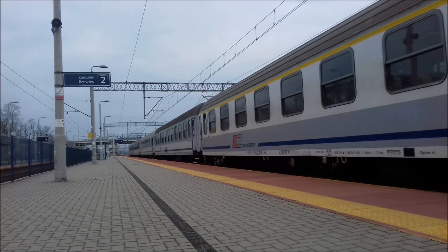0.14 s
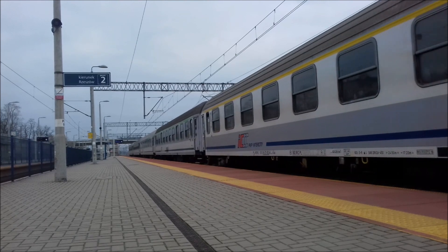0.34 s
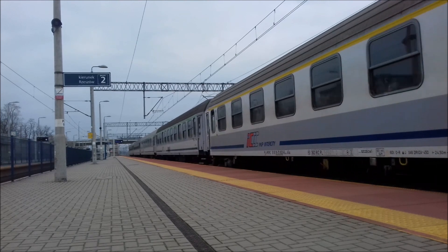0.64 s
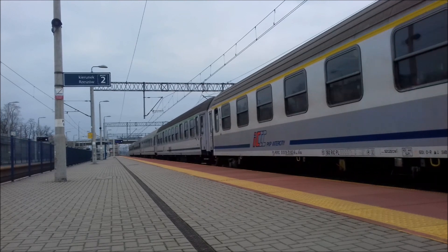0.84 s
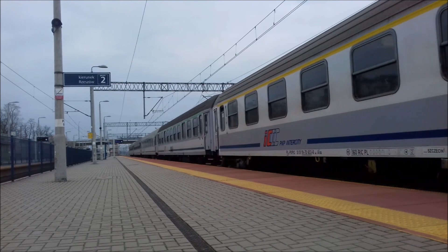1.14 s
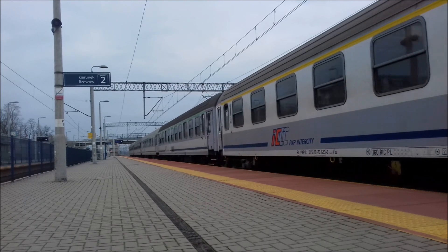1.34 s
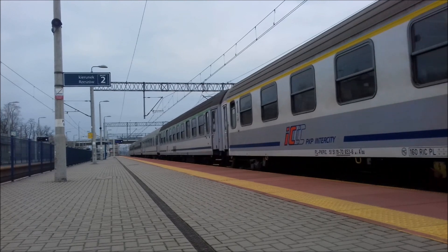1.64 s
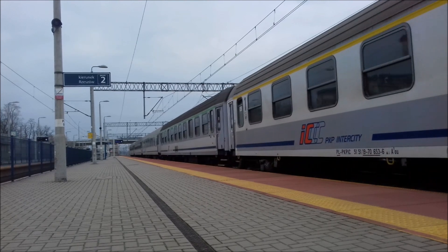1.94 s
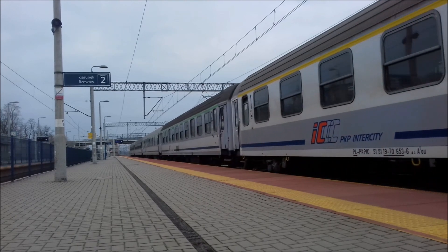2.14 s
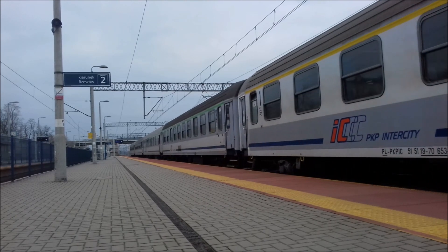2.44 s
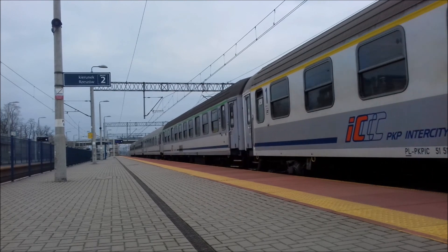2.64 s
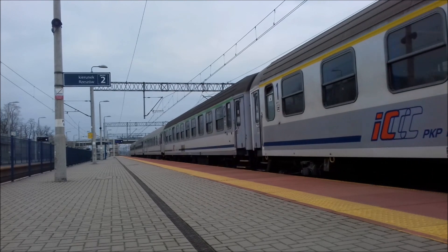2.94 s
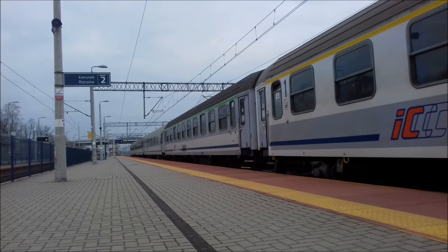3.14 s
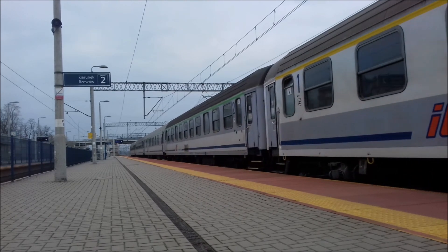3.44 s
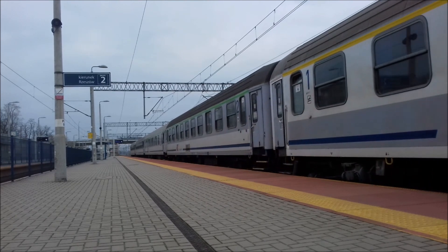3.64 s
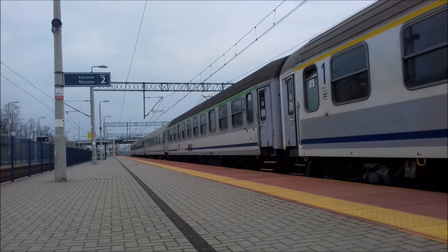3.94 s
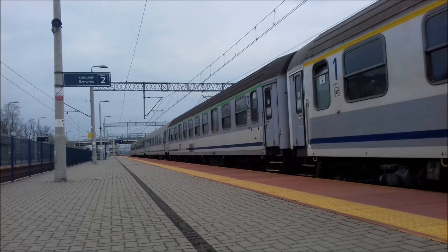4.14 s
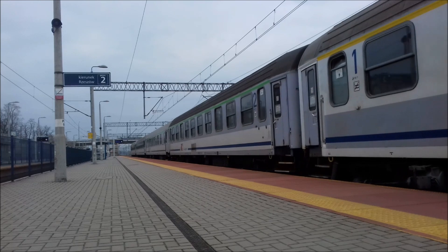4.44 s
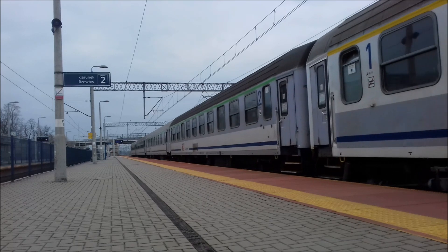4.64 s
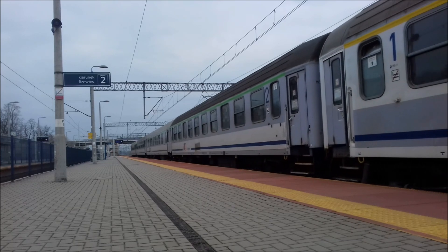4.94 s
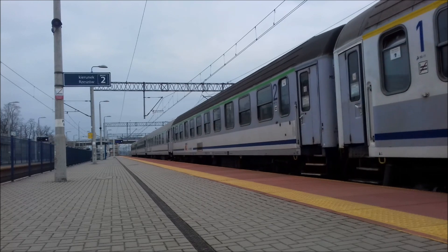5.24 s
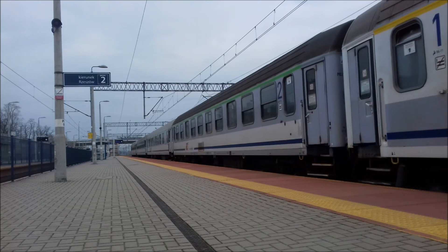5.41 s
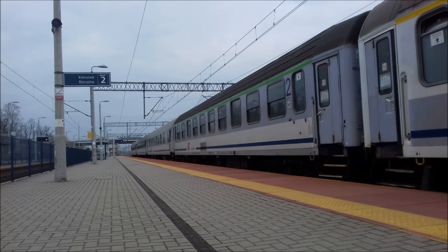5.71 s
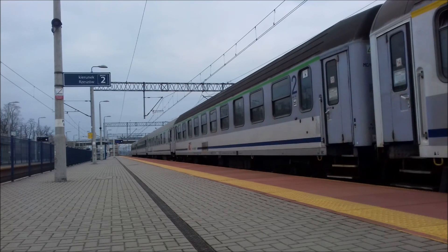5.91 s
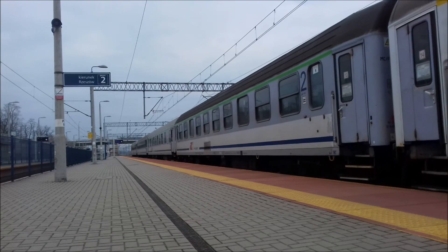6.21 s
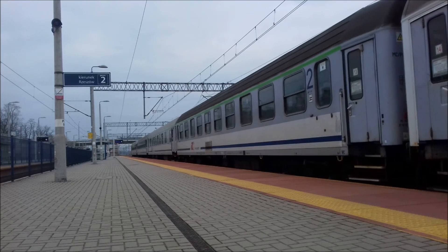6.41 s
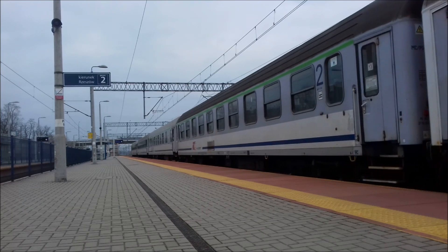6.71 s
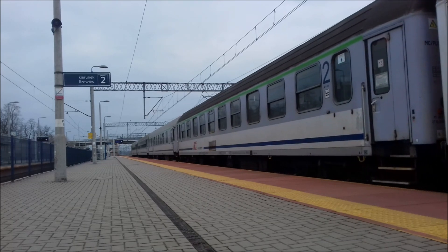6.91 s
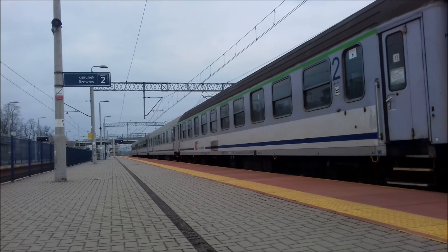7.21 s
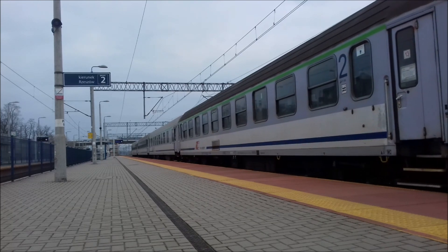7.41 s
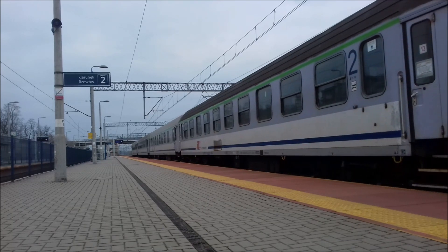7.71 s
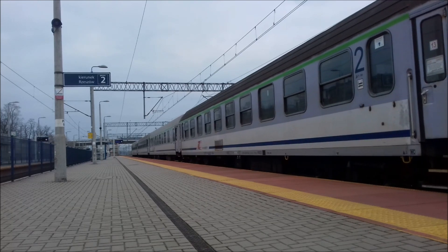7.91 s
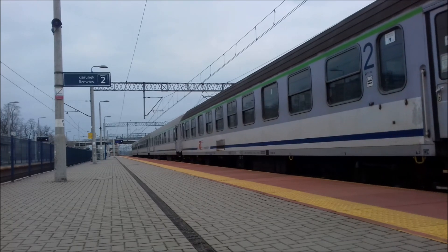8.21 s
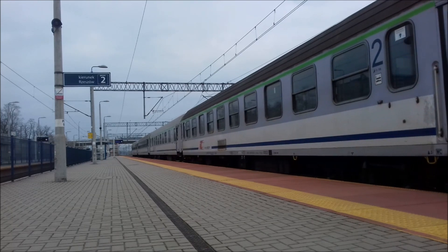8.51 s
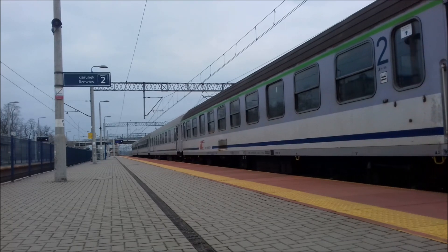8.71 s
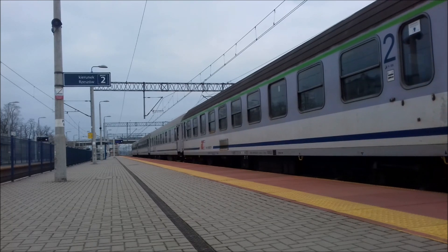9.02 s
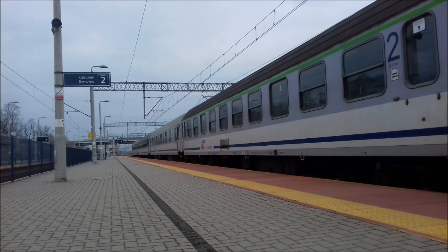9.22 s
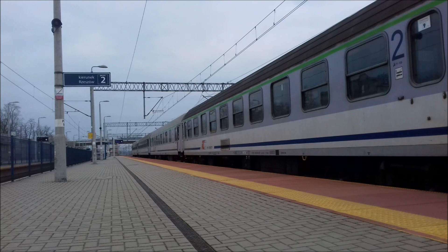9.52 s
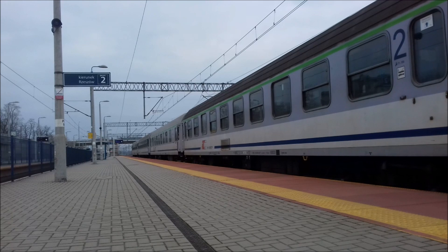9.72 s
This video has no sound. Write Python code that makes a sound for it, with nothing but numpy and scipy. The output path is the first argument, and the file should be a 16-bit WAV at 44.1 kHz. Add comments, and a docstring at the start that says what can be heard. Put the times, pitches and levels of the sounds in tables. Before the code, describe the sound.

High, steady brake squeal from a train slowing beside a platform, weakening into stuttering, creaky rasps as it nearly stops.

```python
"""A wavering squeal near 4.5 kHz: a passenger train brakes to a halt beside an open platform.
Its brake discs ring, many wheels beating against each other over pad hiss and rolling noise.
Faint whistles, scuffs and a half-pitch rattle come and go.
At walking pace a pad starts to groan, then grabs the disc in short, rasping stick-slip bursts."""
import sys
import numpy as np
from scipy import signal
from scipy.fft import rfft, irfft, next_fast_len
from scipy.io import wavfile
from scipy.ndimage import uniform_filter1d, minimum_filter1d, map_coordinates

SR = 44100
rng = np.random.default_rng(int(sys.argv[2]) if len(sys.argv) > 2 else 0)


def master_out(mix):
    """Clip the mix to full scale and print it as 16-bit PCM to the path in sys.argv[1]."""
    frames = np.transpose(np.atleast_2d(mix))
    ceiling = np.clip(frames, -1, 1)
    pcm = np.round(ceiling * 32767).astype(np.int16)
    wavfile.write(sys.argv[1], SR, pcm)


N = 434826
TIME_S = np.arange(N) / SR

# Pitch of the two loudest discs. Each row: time in seconds, near disc in Hz, far disc in Hz.
DISC_PITCH = [(0.1, 4556, 4523), (1, 4527, 4541), (2, 4511, 4526), (3, 4504, 4538), (4, 4504, 4539),
              (6, 4521, 4549), (7.8, 4529, 4545), (8.7, 4471, 4539)]


def amp(db):
    """Decibels to gain."""
    return np.exp(np.asarray(db) * (np.log(10) / 20))


def unit(x):
    """Scale to rms 1."""
    return x / np.sqrt(np.mean(np.abs(x) ** 2) + 1e-20)


def along(points, hz):
    """Interpolate (Hz, value) points on a log frequency axis."""
    knots_hz, values = np.transpose(points)
    return np.interp(np.log(hz + 1), np.log(np.sort(knots_hz) + 1), values)


def curves(rows):
    """One value per sample for each column after the time."""
    knots_s, *columns = np.transpose(rows)
    return [np.interp(TIME_S, knots_s, column) for column in columns]


def strokes(rows, edge_s):
    """Soft-edged gain that opens for each (start s, length s, dB) row."""
    gain = np.zeros(N)
    for start_s, length_s, db in rows:
        span = slice(*np.searchsorted(TIME_S, [start_s - edge_s, start_s + length_s + edge_s]))
        inside_s = np.minimum(TIME_S[span] - start_s, start_s + length_s - TIME_S[span])
        gain[span] += amp(db) * np.clip(inside_s / edge_s + .5, 0, 1)
    return gain


def wobble(knots_per_s):
    """Smooth random curve, rms near 1."""
    knots = rng.standard_normal(int(N * knots_per_s / SR) + 4)
    coarse = np.arange(0, N + 20, 20)
    return np.interp(np.arange(N), coarse, map_coordinates(knots, [coarse * knots_per_s / SR]))


def filtered(x, response):
    """Apply a gain given as a function of Hz."""
    size = next_fast_len(N + SR // 2)
    return irfft(rfft(x, size) * response(np.fft.rfftfreq(size, 1 / SR)), size)[..., :N]


def rush(spectrum, patchy_db):
    """Coloured noise of rms 1 with patches of random gain."""
    bins = signal.stft(rng.standard_normal(N), nperseg=512)[2]
    patches = uniform_filter1d(uniform_filter1d(rng.standard_normal(bins.shape), 5, 0), 12, 1)
    noise = signal.istft(bins * amp(patchy_db * unit(patches)), nperseg=512)[1][:N]
    return unit(filtered(noise, lambda hz: amp(along(spectrum, hz))))


def phasor(hz):
    """Unit complex tone that follows a pitch curve."""
    return np.exp(2j * np.pi * np.cumsum(hz) / SR)


def beating(width_hz):
    """Complex gain of many like tones spread over about width_hz."""
    real, imag = filtered(rng.standard_normal((2, N)), lambda hz: 1 / (1 + (hz / width_hz) ** 3))
    return unit(real + 1j * imag)


def levelled(x):
    """Keep fast beats, even out slow swells."""
    return x / np.sqrt(np.abs(uniform_filter1d(np.abs(x) ** 2, size=SR // 11)) + 1e-9)


def speed(stop_s=10):
    """Even braking: 1 at the start, 0 at the stop."""
    return 1 - TIME_S / stop_s


def squeal(swell_hz=2.092, swell_db=2.5, flutter_depth=.16, second_db=-42, third_db=-57):
    """Two discs hold clear tones; the other wheels and their reflections beat around them."""
    # Tones over the rest of the train. Each row: time in seconds, near disc in dB, far disc in dB.
    prominence = [(0, 1, -12.5), (1.1, 5, -11.5), (2.1, -1.5, -14.5), (2.7, 13, 2.5), (3.6, 3, -3),
                  (4.6, -7, -3.5), (5.4, -6, 0), (6.8, 2, -5), (8.1, -2.5, 2.5), (8.8, 2.5, -15),
                  (9.8, 9.5, -8)]
    # Squeal as brake pressure varies. Each row: time in seconds, level in dB.
    strength = [(0, -8), (1.4, -8.5), (2.1, -11.5), (2.5, -7), (2.75, -13.5), (2.95, -9.5), (3.4, -16),
                (3.9, -10.5), (4.4, -13.5), (5.25, -8.5), (6.15, -11.5), (6.7, -9.5), (7.2, -10.5),
                (8, -17.5), (8.3, -21.5), (8.8, -26), (9.5, -24.5), (9.86, -20)]
    near_hz, far_hz = curves(DISC_PITCH)
    near = phasor(near_hz + 1.902 * wobble(14))
    far = phasor(far_hz + 4 * wobble(12))
    rest = phasor((near_hz + far_hz) / 2)
    crowd = rest * beating(width_hz=36)
    # a neighbouring disc mode flutters the near tone: sidebands, the lower one stronger
    flutter = phasor(156 + 5 * wobble(25))
    fluttered = near * (1 + flutter_depth * speed() ** 2 * (.7 / flutter + .3 * flutter))
    near_db, far_db = curves(prominence)
    chorus = amp(near_db) * fluttered + amp(far_db) * far + crowd
    # turning wheels swell the level, ever slower and shallower
    turns = swell_hz * (np.cumsum(speed()) / SR - .22)
    wheel_db = swell_db * speed() ** 2 * np.cos(2 * np.pi * turns)
    level = np.sqrt(2) * amp(curves(strength)[0] + wheel_db + .86 * wobble(14) + wobble(8))
    # overtones take their own paths and fade as the squeal weakens
    drive = np.minimum(1, level / amp(-12))
    second = levelled(near ** 2 + rest ** 2 * beating(width_hz=60))
    third = levelled(.6 * near ** 3 + rest ** 3 * beating(width_hz=100))
    overtones = amp(second_db) * second + amp(third_db) * third
    return (level * (levelled(chorus) + drive * overtones)).real


def disc(friction):
    """Friction rings the free modes of the steel disc."""
    # Each row: centre in Hz, width in Hz, peak in dB over the plain friction.
    modes = [(4370, 35, 3), (5080, 48, 8), (5400, 55, 5.5), (8150, 20, -5), (8510, 4.3, 2.5),
             (9300, 110, -1.5), (10900, 110, 4.5), (11360, 130, 4), (12580, 70, 5), (13920, 70, 5.5)]

    def response(hz):
        power = sum(amp(db) ** 2 / (1 + (2 * (hz - centre_hz) / width_hz) ** 2)
                    for centre_hz, width_hz, db in modes)
        return np.sqrt(1 + power)
    return filtered(friction, response)


def rolling(dust_db=-60, roar_db=-39.5, rumble_db=-56.5, slowing_db=-6.5):
    """Pads hiss; dust scrapes, wheels roar on the rails and coaches rumble, most as a bogie passes."""
    # Noise spectra. Each row: frequency in Hz, relative density in dB.
    hiss_spectrum = [(3000, -30.5), (3550, -14), (3750, -12), (4000, -2.5), (4300, 0), (4600, 7),
                     (4800, -12), (5200, -23.5), (6000, -31), (7000, -29), (7600, -48.5), (9000, -23),
                     (10000, -54.5)]
    dust_spectrum = [(5500, -7.5), (7000, 7.5), (8600, 3), (10000, -5.5), (11200, -3.5), (12700, -4.5),
                     (14500, -4), (15600, -8.5)]
    roar_spectrum = [(90, -22), (150, -3), (260, -0.5), (350, -4.5), (450, 0.5), (850, -0.5), (1100, 1),
                     (1300, 0.5), (1600, 2), (2000, 1), (3200, 0.5), (5000, -3), (8000, -25), (12000, -54)]
    rumble_spectrum = [(25, -20.5), (45, -12), (65, -8.5), (90, 3.5), (130, -2), (220, -13), (500, -43)]
    # Pad hiss. Each row: time in seconds, level in dB.
    hiss_levels = [(0, -19.5), (.24, -25), (.7, -19.5), (1.3, -23), (1.8, -21), (3.6, -25.5), (4.9, -23),
                   (6.9, -26), (7.8, -32), (9.86, -39)]
    # Passing bogies. Each row: centre and half length in seconds, roar, rumble and dust boosts in dB.
    bogies = [(0.396, .65, 3, 5, 1), (4.363, 0.65, 3.5, 5.5, 2), (5.9, 1.2, 3, 3, 0.5),
              (8.4, 1.1, 6.5, 5, 1.5)]
    roar_boost_db, rumble_boost_db, dust_boost_db = sum(
        np.outer(boosts_db, np.exp(-((TIME_S - centre_s) / half_s) ** 2))
        for centre_s, half_s, *boosts_db in bogies)
    hiss_db, = curves(hiss_levels)
    hiss = amp(.7 * wobble(30)) * unit(disc(rush(hiss_spectrum, patchy_db=.8)))
    dust = amp(1.4 * wobble(50)) * unit(disc(rush(dust_spectrum, patchy_db=1.2)))
    dust_gain = amp(dust_db + 1.4 * (hiss_db - hiss_db.mean()) + dust_boost_db + 1.1 * wobble(6))
    roar = amp(roar_db + roar_boost_db) * rush(roar_spectrum, patchy_db=1.78)
    rumble_gain = amp(rumble_db + slowing_db * (1 - speed()) + rumble_boost_db)
    rumble = rumble_gain * rush(rumble_spectrum, patchy_db=-.5)
    return amp(hiss_db) * hiss + dust_gain * dust + roar + rumble


def whistles():
    """Single modes of other discs sing up faintly and waver."""
    # Each row: start in seconds, length in seconds, pitch in Hz, level in dB.
    notes = [(0, 2.04, 5470, -47), (.4, 2.3, 3710, -41.5), (0.552, 0.56, 8510, -53.5),
             (6.56, 0.23, 5780, -48), (7.986, .44, 5170, -38.5), (9.6, .19, 5080, -38.5)]
    waver = beating(width_hz=55) * amp(2.5 * wobble(7) - 1)
    sound = np.zeros(N)
    for start_s, length_s, hz, db in notes:
        tone = np.exp(2j * np.pi * hz * TIME_S) * np.roll(waver, rng.integers(N))
        sound += strokes([(start_s, length_s, db)], edge_s=.059) * tone.real
    return sound


def scuffs():
    """Brief dry scrapes of a pad that does not yet sing."""
    # Each row: start in seconds, length in seconds, level in dB.
    scrapes = [(.49, .03, -40.5), (.84, 0.05, -40), (1.71, 0.052, -37.5), (2.4, 0.084, -42.5),
               (2.86, 0.054, -41), (3.31, 0.063, -40.5), (3.76, 0.042, -34.5), (4.03, .04, -40),
               (4.19, 0.049, -38.5)]
    # Each row: frequency in Hz, relative density in dB.
    spectrum = [(500, -52), (1400, -26.5), (1900, -9.5), (2270, 3.5), (2700, -8.5), (3800, -27),
                (7000, -68)]
    return strokes(scrapes, edge_s=.04) * rush(spectrum, patchy_db=3)


def pad_rattle():
    """A pad that skips every other cycle adds flickering tones at 1/2 and 3/2 of the squeal pitch."""
    # Each row: start in seconds, length in seconds, level in dB.
    rattles = [(2.65, 0.38, -38.5), (4.6, 0.37, -40), (4.95, 0.46, -33), (5.22, .06, -31),
               (5.55, 0.92, -34.5), (6.45, 0.416, -29.5), (6.87, 0.39, -32)]
    half = phasor(curves(DISC_PITCH)[1] / 2)
    tones = half * beating(width_hz=70) + amp(-20) * half ** 3 * beating(width_hz=140)
    flicker = amp(2.3 * wobble(30) - 4.4)
    return flicker * strokes(rattles, edge_s=.07) * unit(tones.real)


def groan(peak_s=8.46, level_db=-36, rise_db_per_s=6.5, fall_db_per_s=.5, stop_hz=594, glide_hz=249.3):
    """A dragging pad hums and stutters in its caliper, its pitch sinking as the train slows."""
    swell_db = np.minimum(rise_db_per_s * (TIME_S - peak_s), fall_db_per_s * (peak_s - TIME_S))
    stutter = amp(2.8 * wobble(18) - 1)
    hum = phasor(stop_hz + glide_hz * speed()) * beating(width_hz=72)
    return amp(level_db + swell_db) * stutter * unit(hum.real)


def grabs(edge_s=.008, release_s=.008, sag_hz_per_s=250, honk_fade_s=8.55, grit_db=-8):
    """Stick-slip: each grab is a sagging buzz with shifting harmonics and a puff of grit per slip."""
    # Each row: start in seconds, length in seconds, first slip rate in Hz, level in dB.
    bites = [(7.637, 0.024, 600, -39), (7.741, 0.058, 590, -38.5), (8.045, 0.078, 594.6, -28.5),
             (8.266, .04, 572.6, -29), (8.33, .038, 566, -26.5), (8.521, .032, 560.2, -25),
             (8.581, 0.033, 563.4, -27.5), (8.713, .08, 559.7, -25.5), (8.836, .03, 589.2, -30.5),
             (8.887, .03, 560, -24.5), (9.012, .07, 531.5, -24.5), (9.084, .08, 562, -25.5),
             (9.207, 0.034, 550.8, -28.5), (9.25, .055, 520, -24.5), (9.357, 0.063, 546, -24.5),
             (9.607, 0.051, 558.4, -25.5), (9.655, .105, 528, -26), (9.758, .036, 565, -23),
             (9.802, .062, 545.2, -29)]
    # Caliper response. Each row: frequency in Hz, relative gain in dB.
    caliper = [(100, -48), (300, -29.5), (550, -5), (1110, -4), (1600, 0), (2100, -3), (3100, -3),
               (4250, 0), (4800, -13.5), (5400, -10.5), (7800, -24), (8800, -22), (10000, -43),
               (15500, -39.5)]
    bite = strokes([(start_s, length_s, db) for start_s, length_s, _, db in bites], edge_s)
    pole = np.exp(-1 / (release_s * SR))
    grip = np.maximum(bite, signal.lfilter([1 - pole], [1, -pole], bite))
    starts_s, _, first_hz, _ = np.transpose(bites)
    latest = np.searchsorted(starts_s, TIME_S + edge_s / 2) - 1
    slip_hz = first_hz[latest] - sag_hz_per_s * np.maximum(0, TIME_S - starts_s[latest])
    cycles = np.cumsum(slip_hz * (1 + .015 * wobble(70) + .023 * wobble(400))) / SR
    slipping = np.flatnonzero(grip > amp(-70))
    # the caliper honks at twice the slip rate, less as the disc creeps
    honk_db = 8 - 7 * np.maximum(0, TIME_S[slipping] - honk_fade_s)
    buzz = np.zeros(N)
    for k in range(1, 28):
        # the contact patch moves: harmonics drift in strength and phase, high ones faster
        knots_per_s = 45 + 22 * k
        knots = rng.standard_normal((int(N * knots_per_s / SR) + 2, 2)) @ [1, 1j]
        drift = 1 + .7 * np.interp(slipping * knots_per_s / SR, np.arange(len(knots)), knots)
        db = along(caliper, k * slip_hz[slipping]) + (k == 2) * honk_db
        buzz[slipping] += (amp(db) * drift * np.exp(2j * np.pi * k * cycles[slipping])).real
    buzz[slipping] = unit(buzz[slipping])
    puffs = np.exp(-1.5 * (cycles % 1))
    grit = unit(rush(caliper, patchy_db=2.5) * puffs * amp(4 * wobble(250)))
    return grip * disc(buzz + amp(grit_db) * grit)


def platform(x, delay_samples=200):
    """Echoes between the coach floor and the platform wall."""
    # Each row: frequency in Hz, time to fall 60 dB in seconds.
    decay_times = [(200, 0.44), (2000, 0.16), (10000, 0.024)]
    hz, age_s, bins = signal.stft(rng.standard_normal(SR // 2), SR, nperseg=256)
    decay = amp(-60 * age_s / along(decay_times, hz)[:, None])
    tail = signal.istft(bins * decay, SR, nperseg=256)[1]
    return signal.fftconvolve(np.pad(x, (delay_samples, 0)), tail / np.linalg.norm(tail))[:N]


def scene(echo_db=-5.5):
    """Brakes and rolling noise in mono; only the grabs get the platform echo."""
    rasp = grabs()
    brakes = squeal() + whistles() + pad_rattle() + scuffs() + groan() + rasp
    return (brakes + amp(echo_db) * platform(rasp) + rolling())[None]


def record(dry, ceiling=.9, low_hz=36, top_hz=15700):
    """A fast limiter holds the peaks; the microphone drops the deep bass and the highest treble."""
    needed_gain = np.minimum(1, ceiling / (np.abs(dry) + 1e-9))
    held = dry * uniform_filter1d(minimum_filter1d(needed_gain, size=400), size=400)
    return filtered(held, lambda hz: (hz < top_hz) * hz ** 4 / (hz ** 4 + low_hz ** 4))


dry = scene()
out = record(dry)
master_out(out)
```